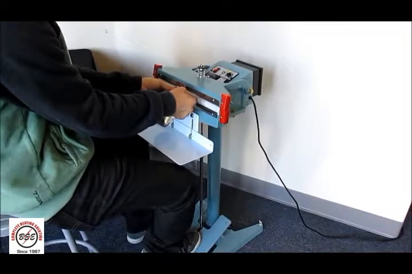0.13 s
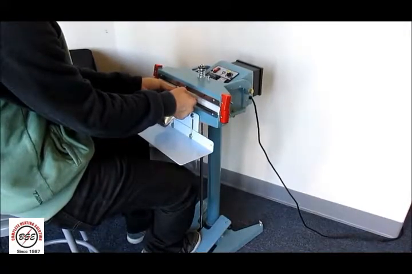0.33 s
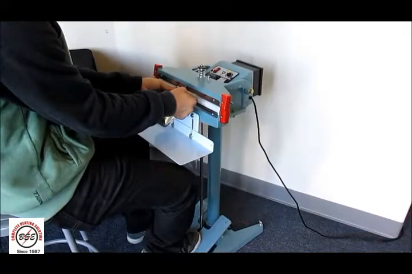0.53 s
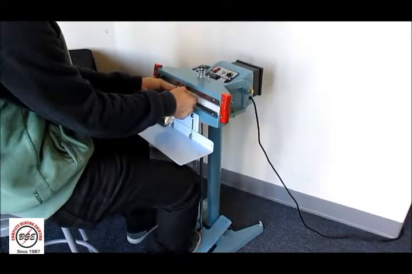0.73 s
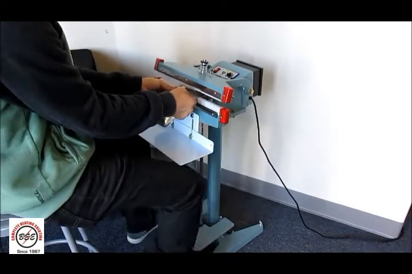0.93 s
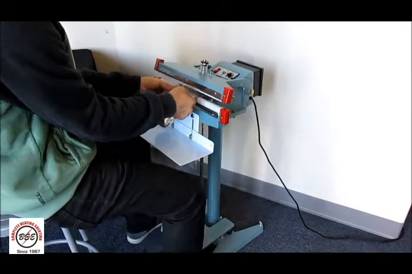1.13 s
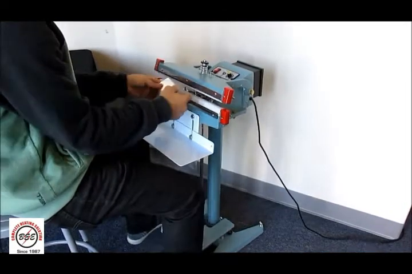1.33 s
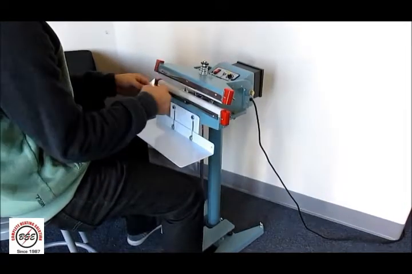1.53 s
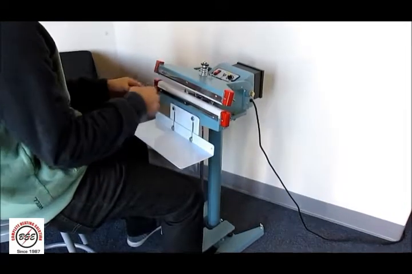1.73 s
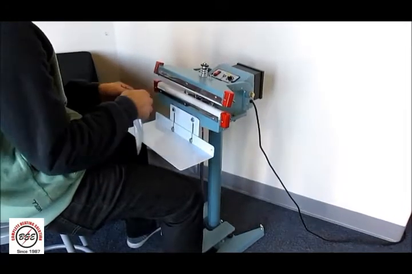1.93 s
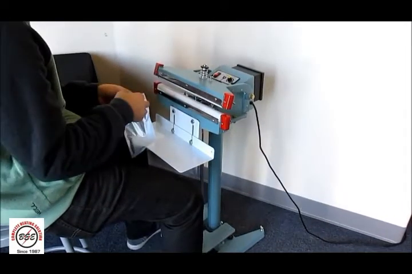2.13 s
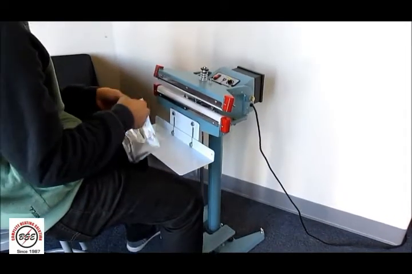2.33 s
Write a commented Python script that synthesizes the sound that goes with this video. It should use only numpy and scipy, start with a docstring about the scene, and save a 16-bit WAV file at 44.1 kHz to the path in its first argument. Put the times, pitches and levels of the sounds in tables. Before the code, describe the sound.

A pedal-operated bag sealer clicks, its rod scrapes, and the steel jaw clacks open with a brief ring. A plastic bag then crackles and lightly taps a metal tray, heard nearby in a quiet room with low rumble.

```python
"""Foot-pedal bag sealer

In a quiet room a relay clicks, the pedal rod scrapes and rattles in its guide, and the steel jaw
clacks open, thudding the stand and ringing the frame. A plastic bag then crackles, pops and brushes
the sheet-metal tray. Building rumble and ventilation air lie underneath; the clack ducks the mix."""
import sys
import numpy as np
from scipy import signal
from scipy.fft import rfft, irfft
from scipy.io import wavfile

SR = 44100
rng = np.random.default_rng(int(sys.argv[2]) if len(sys.argv) > 2 else 0)


def dump_mix(stems):
    """Bounce the given channels to the path in sys.argv[1] as a 16-bit WAV at rate SR."""
    frames = np.atleast_2d(stems).T  # one column per channel
    limited = np.clip(frames, -1, 1)  # hard clip at full scale
    pcm = np.round(limited * 32767).astype(np.int16)
    wavfile.write(sys.argv[1], SR, pcm)


N = 105840

# The jaw's blow and bounces: t/s, level/dB
JAW_HITS = [(.7853, -9.5), (0.7896, -22), (0.791, -22.5), (0.8004, -28)]
# Steel jaw resonances: f/Hz, base width/Hz, level/dB
JAW_BODY = [(656, 440, -14), (1080, 500, -9.5), (1890, 630, -11), (3023, 200, 3.5), (3563, 600, 3),
            (4190, 550, -6.5), (6250, 410, -1), (7330, 400, -3.5), (8220, 700, -0.5), (8480, 810, -3.5),
            (10750, 660, -0.5), (13000, 1200, -15.5)]
# Ring of the frame: f/Hz, level/dB, t60/s
FRAME_MODES = [(445, -15, .5), (815, -15, 0.7), (996, -14, .7), (1250, -12, .6), (1430, -5, .47),
               (1850, -10, 0.6), (2590, -14, .6), (2775, -13, .7), (2895, -7, 1.1), (2985, -15, .7),
               (3550, -14, 0.2), (4550, -16, 0.4), (5000, -15, .5), (5730, -11, 1.), (6150, -17, .6)]
# Rod strokes: t/s, rise/s, hold/s, t60/s, scrape/dB, hiss re scrape/dB, tilt/(dB/octave), knock/dB
ROD_STROKES = [(0.671, 0.026, 0.0014, 0.03, -34, 0, -2, -67),
               (.6865, .0005, 0.001, 0.0098, -38, 8.5, -5, -60.5),
               (.6956, 0.0007, 0.003, 0.03, -35, 0, -6, -29),
               (0.697, 0.0026, 0.012, 0.017, -37, 8, 14, -65),
               (0.7575, 0.0006, 0.003, 0.038, -23.5, -16.5, 2, -64.5),
               (.7592, .003, .022, 0.02, -26.5, -10, 4, -34),
               (0.854, 0.0044, 0.011, 0.4, -35.5, -24, -4.5, -62)]
# Rod resonances: f/Hz, width/Hz, level/dB
ROD_BODY = [(560, 250, -12), (820, 110, -1), (1000, 120, 0), (1300, 180, -1), (1860, 130, 5),
            (3000, 500, -14), (5100, 550, -22)]
# Ring of the relay armature: f/Hz, level/dB, t60/s
RELAY_MODES = [(950, -10, 0.05), (1300, -15, 0.04), (1881, -12, .04), (2760, -1, 0.04), (2840, -19, 0.18),
               (3570, -8, .05), (5270, -11, .04), (5990, -6, 0.25), (8500, -6, 0.04), (9390, -5, .12),
               (10500, -16, .04), (12200, -6, .05), (12850, 1, .08), (13700, -6, .06)]
# Bag crackles: t/s, level/dB, f/Hz, half-width/octaves, hold/s, t60/s, tray ring re crackle/dB
CRACKLES = [(0.211, -58.5, 9150, 0.54, 0.0053, 0.056, -45), (1.056, -47, 1210, 0.66, 0.0031, 0.023, -42),
            (1.095, -58, 1180, 0.64, 0.0027, 0.027, -40), (1.152, -44, 9700, 0.23, 0.0019, 0.013, -38),
            (1.194, -41, 3000, 4.3, .004, 0.029, -42), (1.21, -30.5, 3000, 7.3, 0.0015, 0.023, -40),
            (1.221, -46, 3420, 2.6, 0.024, 0.29, -40), (1.359, -46, 3100, 0.35, 0.0016, 0.026, -40),
            (1.4367, -32, 8000, 1.1, 0.0015, 0.02, -44), (1.486, -44, 4940, 5.6, 0.014, 0.06, -40),
            (1.5745, -42.5, 1630, 0.35, 0.00069, 0.028, -29), (1.591, -51, 9150, 0.46, 0.0053, .03, -42),
            (1.617, -33.5, 3200, 1.6, 0.0013, 0.14, -35), (1.622, -36.5, 1300, 0.7, 0.0071, 0.021, -34),
            (1.6574, -26, 4930, 2.8, 0.0018, 0.068, -17.5), (1.691, -30.5, 3960, 4.2, .003, 0.075, -41),
            (1.705, -38.5, 3500, 1.9, 0.01, 0.05, -40), (1.783, -45.5, 7300, 0.59, 0.0018, 0.01, -37),
            (1.8083, -27, 5130, 2.2, 0.00066, 0.059, -12), (1.829, -45.5, 8000, 1.4, 0.035, 0.83, -41),
            (1.9165, -38, 4300, 1, 0.0014, 0.013, -16), (1.9218, -38, 5070, 2.1, 0.0017, .02, -9),
            (1.9698, -41, 1500, 1.5, 0.0024, 0.037, -10), (1.975, -44.5, 500, 0.65, 0.01, 0.017, -40),
            (1.9963, -35, 2880, 0.71, 0.001, 0.0067, -32), (2.021, -35.5, 2510, 1.83, 0.0025, 0.023, -18.5),
            (2.115, -56.5, 8000, 0.56, .004, 0.033, -46)]
# Ring of the sheet-metal tray: f/Hz, level/dB, t60/s
TRAY_MODES = [(930, -22, 0.47), (1726, -3, .6), (1884, -11, 0.22), (2062, -3.5, 0.42), (2290, -12, 0.47),
              (3100, -4, 0.064), (3540, -11, 0.19), (4250, -1, 0.16), (6240, -9, 0.065)]
# Short pitched ticks, film pops and the ping of the bag tapping the tray: t/s, level/dB, f/Hz, width/Hz
TICKS = [(1.2088, -39, 9500, 2500), (1.2112, -29, 7950, 1800), (1.4367, -17.5, 3400, 940),
         (1.439, -30, 3660, 800), (1.437, -27.5, 5800, 915), (1.8096, -23.5, 3100, 790),
         (1.8098, -21.5, 6170, 1000), (1.9972, -40, 2560, 696)]
# Rustle envelope: t/s, level/dB
RUSTLE_LEVEL = [(1.05, -48.5), (1.414, -53), (1.526, -55), (1.708, -51.5), (1.808, -54.5), (1.886, -51),
                (2.074, -54.5), (2.2, -73)]
# Rustle tone: f/Hz, level/dB
RUSTLE_EQ = [(240, -39), (400, -8), (1400, -2.5), (1690, -3.5), (1930, -8), (8670, -17), (13900, -14),
             (15500, -51.5)]
# Swell of the building rumble: t/s, level/dB
RUMBLE_LEVEL = [(0, -35.5), (.25, -31.5), (.5, -32.5), (.75, -32.5), (.95, -39.5), (1.15, -40), (1.3, -33),
                (1.55, -35.5), (1.8, -37), (2., -35.5), (2.17, -38.5), (2.3, -33), (2.4, -35)]
# Extra swell of its sub-bass: t/s, level/dB
SUB_LEVEL = [(0, -7.5), (.3, -2.5), (.55, -2.5), (.85, -7), (1.1, 2), (1.3, -1), (1.6, -2), (1.9, -1),
             (2.15, 10), (2.4, -9)]
# Rumble tone: f/Hz, level/dB
RUMBLE_EQ = [(18, -35.5), (28, 1), (43, 3.5), (70, -8), (96, -1.5), (260, -42.5), (340, -64), (570, -120)]
# Ventilation tone: f/Hz, level/dB
AIR_EQ = [(88, -11), (150, -6), (190, -15.5), (280, -17.5), (622, -28.5), (660, -29), (974, -26.5),
          (2740, -38), (6700, -45.5), (14900, -41.5), (15800, -50)]
# Stereo image of rumble and air: f/Hz, left-right correlation
BED_CORRELATION = [(60, 1), (180, 0.83), (550, 0.64), (1650, 0.39), (4970, -0.39), (15000, 0.45)]
# Reverb decay: f/Hz, t60/s
ROOM_T60 = [(300, 1), (1000, 0.84), (3000, 0.71), (8000, 0.44), (14000, 0.36)]
# Stereo image of the reverb: f/Hz, left-right correlation
ROOM_CORRELATION = [(300, 1), (700, 1), (1500, .4), (4000, 0)]
# Pan of the direct sound: f/Hz, left minus right/dB
LEFT_LEVEL = [(100, 3.5), (350, 0), (700, 3), (1400, 9), (2800, 1.5), (5600, 3.5), (9000, 2), (14000, 0.5)]
# Phase of the direct sound: f/Hz, left lead/rad
LEFT_PHASE = [(300, 8), (700, 0), (1500, 0.56), (2800, 0.57), (5600, 1.), (8300, 1.04), (11000, 1.57),
              (15000, 1.5)]
# Microphone response: f/Hz, level/dB
MIC_EQ = [(6000, -1), (10000, -2), (12500, -6), (14500, -11.5), (15500, -32)]


def jaw_clack(widen):
    """The jaw hits its stop and bounces: a sharp blow plus grit drives the steel's resonances."""
    out = np.zeros(N)
    for start, db in JAW_HITS:
        grit = burst(rise=0.00025, hold=0.00046, t60=0.021)
        blow = gain_of(24) * signal.unit_impulse(len(grit), 4)
        add(out, start, gain_of(db) * (body(grit + blow, JAW_BODY, widen) + gain_of(-12) * grit))
    return out


def stand():
    """At the jaw's blow the stand thuds and the frame rings on."""
    out, start = np.zeros(N), JAW_HITS[0][0]
    thud_hz, width_hz = 254, 350
    thud = body(burst(rise=0.00084, hold=0.0025, t60=0.07), [(thud_hz, width_hz, 0)])
    add(out, start, gain_of(-27.5) * thud)
    add(out, start, gain_of(-28.5) * ring(FRAME_MODES))
    return out


def pedal_rod(contact_s=0.0004):
    """The pedal rod scrapes and knocks in its guide; each stroke is duller or brighter."""
    out = np.zeros(N)
    for start, rise, hold, t60, db, hiss_db, tilt_db, knock_db in ROD_STROKES:
        scrape = gain_of(db) * burst(rise, hold, t60)
        peaks = [(hz, width, level + tilt_db * np.log2(hz / 1000)) for hz, width, level in ROD_BODY]
        contact = np.minimum(np.arange(len(scrape)) / (contact_s * SR), 1)
        knock = gain_of(knock_db) * np.sin(np.pi * contact) ** 2
        hiss = gain_of(hiss_db) * np.diff(scrape, append=0)
        add(out, start, body(scrape + knock, peaks) + hiss)
    return out


def relay(start=0.609):
    """Contacts strike and chatter, ringing the small armature under a bright snap."""
    out = np.zeros(N)
    chatter = burst(rise=0.00036, hold=0.0049, t60=0.09)
    strike = gain_of(26) * signal.unit_impulse(len(chatter), 30)
    armature = signal.fftconvolve(chatter + strike, ring(RELAY_MODES))
    add(out, start, armature / np.std(armature[200:1000]))
    add(out, start, gain_of(-3) * np.diff(chatter))
    return gain_of(-31.5) * out


def bag_crackles():
    """Each crackle is a band of crack and grit; some tap the tray hard enough to bring out its ring."""
    out, pad = np.zeros(N), 100
    for start, db, centre, octaves, hold, t60, tray_db in CRACKLES:
        grit = burst(0.00032, hold, t60)
        crack = gain_of(9) * signal.unit_impulse(len(grit), 9)
        bell_db = lambda hz: -6 * (np.log2((hz + 1) / centre) / octaves) ** 2
        crackle = equalise(np.roll(grit + crack, pad), bell_db)[pad:]
        band_share = min(1, 2.16 * octaves * centre / SR)
        add(out, start, gain_of(db) * crackle / np.sqrt(band_share))
        add(out, start, gain_of(db + tray_db) * ring(TRAY_MODES))
    return out


def pitched_ticks():
    """Film pops and the ping of the bag tapping the tray: a few cycles that swell and die at one pitch."""
    out, tap = np.zeros(N), signal.unit_impulse(1024)
    for start, db, hz, width in TICKS:
        tick = resonate(resonate(tap, hz, width), hz, width)
        add(out, start, gain_of(db) * tick / abs(tick).max())
    return out


def bag_rustle(snaps_per_s=11000, spread_db=3):
    """Thousands of tiny snaps in the plastic blur into a rustle."""
    snaps = (rng.random(N) < snaps_per_s / SR) * rng.standard_normal(N)
    snaps *= gain_of(spread_db * np.minimum(rng.exponential(1, N), 4))
    rustle = unit_rms(equalise(snaps, lambda hz: at_hz(RUSTLE_EQ, hz)))
    start, end = RUSTLE_LEVEL[0][0], RUSTLE_LEVEL[-1][0]
    fade = np.interp(np.arange(N) / SR, [start - 0.1, start, end, end + 0.082], [0, 1, 1, 0])
    return fade * envelope(RUSTLE_LEVEL) * rustle


def room(x, early_t60=0.02):
    """Sparse reflections of random sign: a quick nearby cluster and a tail whose highs die first."""
    taps = np.zeros((2, SR))
    arrivals = np.arange(200, SR - 20, 20) + rng.integers(0, 20, (2, (SR - 201) // 20))
    np.put_along_axis(taps, arrivals, rng.choice([-1., 1.], arrivals.shape), 1)
    hz, t, bands = signal.stft(taps, SR, nperseg=256)
    decay = gain_of(-60 * t / at_hz(ROOM_T60, hz)[:, None])
    late = signal.istft(bands * decay, SR, nperseg=256)[1][:, :SR]
    early = taps * gain_of(-60 * np.arange(SR) / SR / early_t60)
    reverb = gain_of(-8.5) * late / np.linalg.norm(late[0])
    reverb += gain_of(-20) * early / np.linalg.norm(early[0])
    reverb = irfft(stereo_spectra(reverb, ROOM_CORRELATION), SR)
    return signal.fftconvolve(x[None], reverb, axes=1)[:, :N]


def building(sub_hz=62, air_db=-45.5, lean_db=1.57):
    """The bed: low rumble that swells and steady ventilation air, both leaning slightly left."""
    hz = np.fft.rfftfreq(N, 1 / SR)

    def noise(eq):
        spectra = stereo_spectra(rng.standard_normal((2, N)), BED_CORRELATION)
        in_band = (hz > eq[0][0]) & (hz < eq[-1][0])
        return unit_rms(irfft(spectra * gain_of(at_hz(eq, hz)) * in_band, N))
    rumble = noise(RUMBLE_EQ)
    sub = irfft(rfft(rumble) / (1 + (hz / sub_hz) ** 8), N)
    rumble += (envelope(SUB_LEVEL) - 1) * sub
    bed = envelope(RUMBLE_LEVEL) * rumble + gain_of(air_db) * noise(AIR_EQ)
    return bed * gain_of([[lean_db / 2], [-lean_db / 2]])


def mic_ports(x):
    """Two close microphone ports hear the direct sound with different level and phase."""
    hz = np.fft.rfftfreq(N, 1 / SR)
    left = gain_of(at_hz(LEFT_LEVEL, hz) / 2) * np.exp(0.5j * at_hz(LEFT_PHASE, hz))
    return irfft(rfft(x) * np.array([left, 1 / left]), N)


def burst(rise, hold, t60):
    """Noise that rises, holds and dies away (times in s), with the energy of its envelope."""
    t = np.arange(8192) / SR
    shape = np.minimum(t / rise, 1) * gain_of(-60 * np.maximum(t - rise - hold, 0) / t60)
    noise = shape * rng.standard_normal(len(t))
    return noise * np.linalg.norm(shape) / np.linalg.norm(noise)


def resonate(x, hz, width):
    """One resonance with unity gain at its peak."""
    r = np.exp(-np.pi * width / SR)
    poles = [2, -4 * r * np.cos(2 * np.pi * hz / SR), 2 * r ** 2]
    return signal.lfilter([1 - r ** 2, 0, r ** 2 - 1], poles, x)


def body(x, peaks, widen=1):
    """Parallel resonances with make-up gain for their bandwidth."""
    power = sum(gain_of(2 * db) * np.pi * width * widen / SR for _, width, db in peaks)
    return sum(gain_of(db) * resonate(x, hz, width * widen) for hz, width, db in peaks) / np.sqrt(power)


def ring(modes, blur=0.012):
    """Dying modes, each a narrow noise band wavering around its pitch."""
    t = np.arange(SR // 2) / SR
    out = np.zeros(len(t))
    for hz, db, t60 in modes:
        tone = resonate(rng.standard_normal(2 * len(t)), hz, blur * hz)[len(t):]
        out += gain_of(db - 2 - 60 * t / t60) * unit_rms(tone)
    return out


def stereo_spectra(pair, correlation):
    """Left and right spectra of two independent signals, blended to a correlation curve."""
    left, other = rfft(pair)
    shared = at_hz(correlation, np.fft.rfftfreq(pair.shape[-1], 1 / SR))
    return np.array([left, shared * left + np.sqrt(1 - shared ** 2) * other])


def equalise(x, db_at):
    """EQ by a gain in dB given as a function of frequency."""
    hz = np.fft.rfftfreq(x.shape[-1], 1 / SR)
    return irfft(rfft(x) * gain_of(db_at(hz)), x.shape[-1])


def at_hz(points, hz):
    """A curve's value on a log-frequency axis."""
    knots, values = np.transpose(points)
    return np.interp(np.log(hz + 1), np.log(knots + 1), values)


def envelope(points):
    """A fader ride: linear gain through (t/s, level/dB) points."""
    times, db = np.transpose(points)
    return gain_of(np.interp(np.arange(N) / SR, times, db))


def gain_of(db):
    return 10 ** (np.asarray(db) / 20)


def unit_rms(x):
    return x / np.sqrt(np.mean(x ** 2) + 1e-20)


def add(mix, start, sound):
    part = mix[round(start * SR):][:len(sound)]
    part += sound[:len(part)]


def scene():
    """Sealer and bag, direct and through the room, over the building's bed."""
    foley = relay() + pedal_rod() + bag_crackles() + bag_rustle() + pitched_ticks() + stand()
    direct = mic_ports(foley + jaw_clack(widen=0.86))
    reverb = room(foley + jaw_clack(widen=3.1))  # heard from all sides, the jaw's resonances are wider
    return direct + reverb + building()


def record(dry):
    """Microphone colour; gain control that sinks after the clack and creeps back; clipping; band limit."""
    knee_db, squeeze, smooth_s, release_db_per_s = -24.5, 0.55, 0.011, 15
    heard = equalise(dry, lambda hz: at_hz(MIC_EQ, hz))
    power = signal.lfilter(np.ones(400) / 400, 1, (heard ** 2).mean(0))
    power_db = 10 * np.log10(abs(power) + 1e-12)
    fall_db = np.arange(N) * release_db_per_s / SR
    held_db = np.maximum.accumulate(power_db + fall_db) - fall_db  # peak detector, slowly letting go
    over_db = np.maximum(held_db - knee_db, 0)
    pole = np.exp(-1 / (smooth_s * SR))
    duck_db = squeeze * signal.lfilter([1 - pole], [1, -pole], over_db)
    ducked = np.clip(heard / gain_of(duck_db), -1, 1)
    lowpass = signal.firwin(511, 15900, window=("kaiser", 9), fs=SR)
    return np.clip(signal.oaconvolve(ducked, lowpass[None], "same"), -1, 1)


dry = scene()
out = record(dry)
dump_mix(out)
```